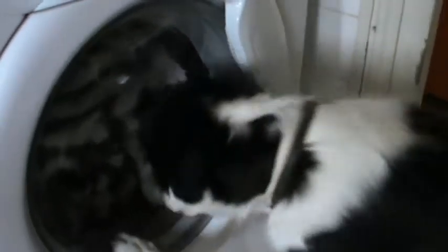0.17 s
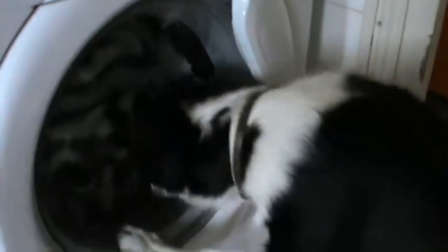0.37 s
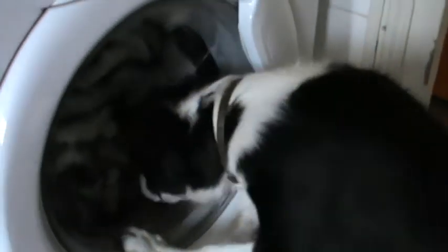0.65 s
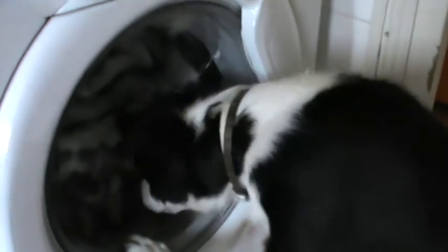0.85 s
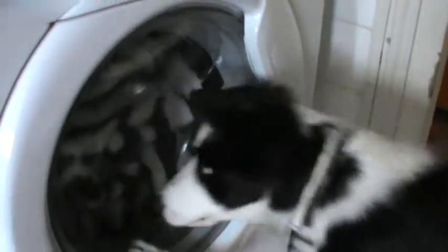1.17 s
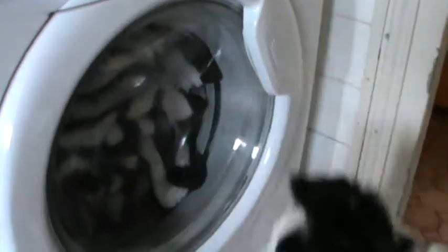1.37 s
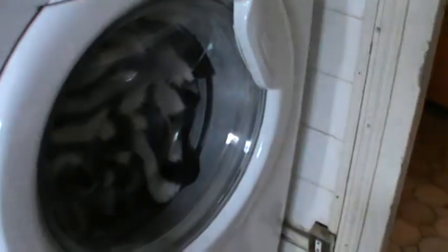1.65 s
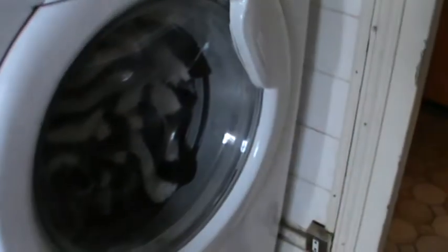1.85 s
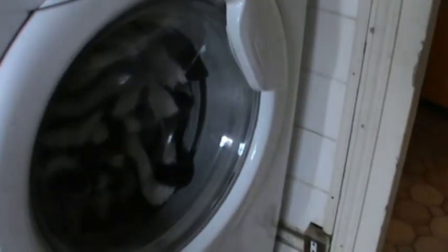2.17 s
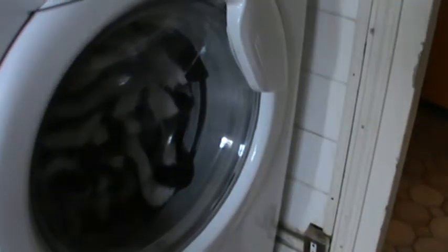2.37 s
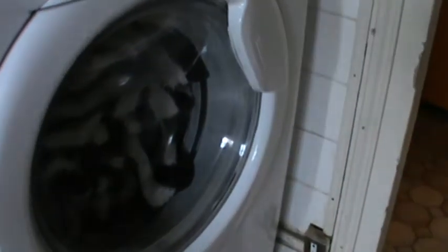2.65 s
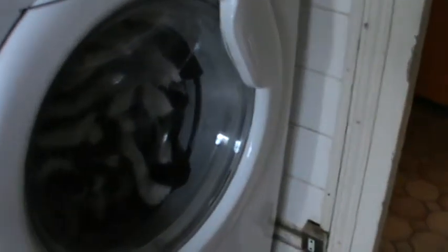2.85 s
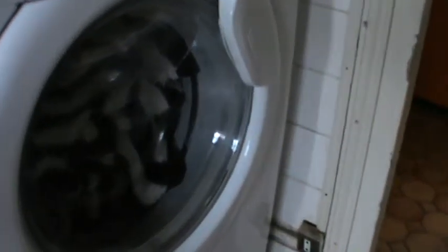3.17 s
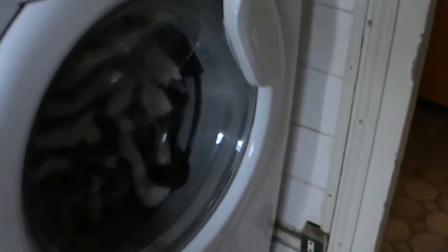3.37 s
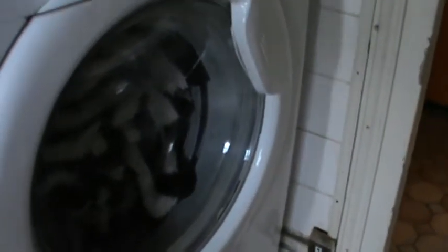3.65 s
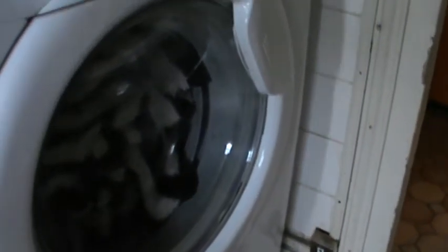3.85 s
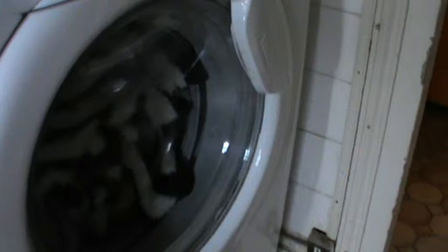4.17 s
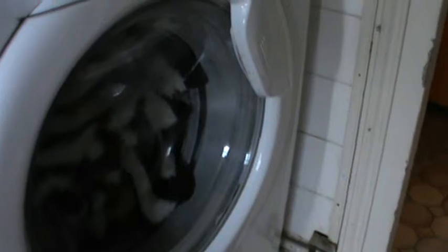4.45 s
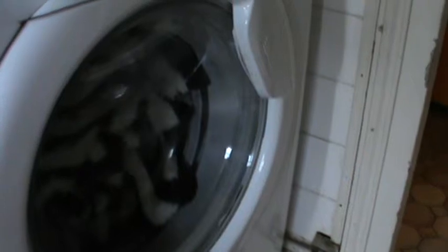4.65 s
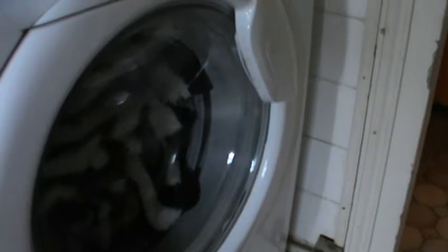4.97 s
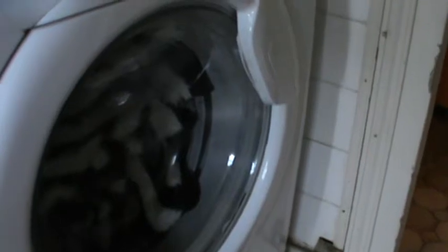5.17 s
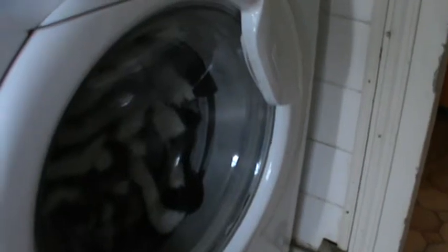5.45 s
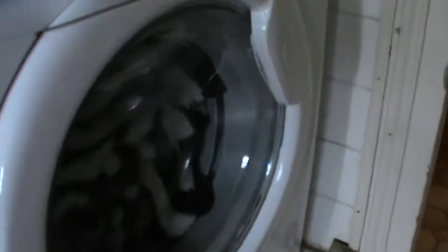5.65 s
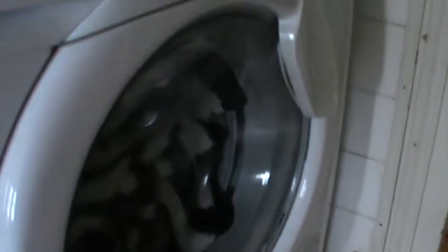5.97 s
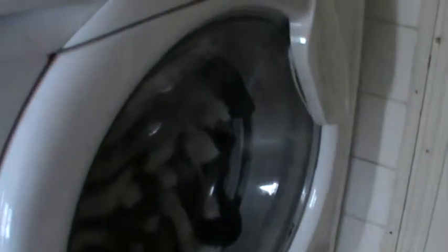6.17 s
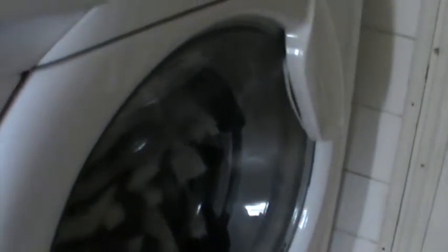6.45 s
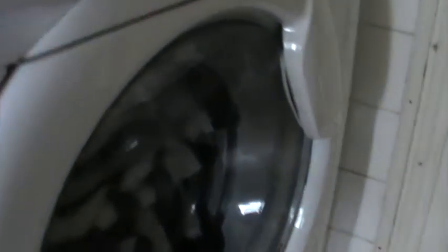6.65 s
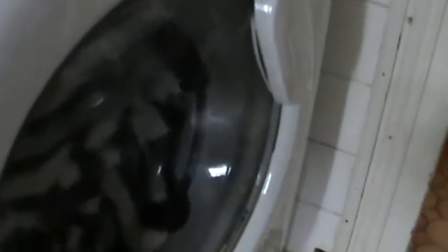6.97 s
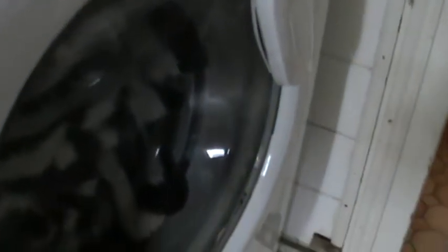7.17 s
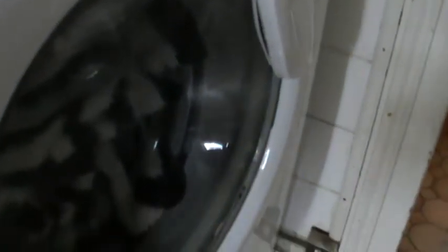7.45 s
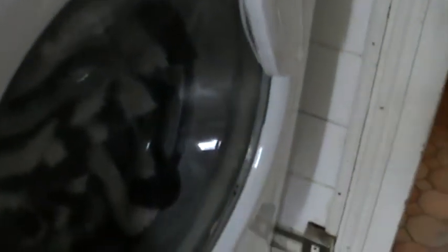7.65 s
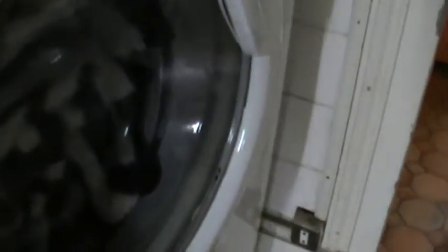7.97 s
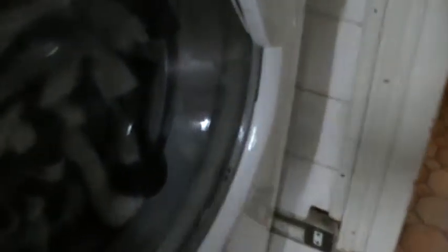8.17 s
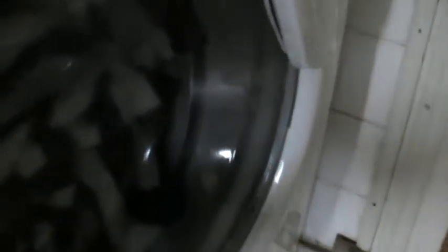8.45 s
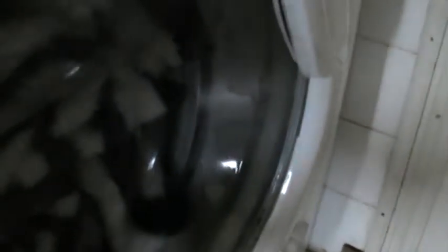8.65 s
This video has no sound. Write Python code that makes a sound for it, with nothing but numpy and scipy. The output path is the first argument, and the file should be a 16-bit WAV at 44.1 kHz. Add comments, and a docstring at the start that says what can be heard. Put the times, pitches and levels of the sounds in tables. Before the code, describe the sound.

Close to a front-loading washer in a small tiled room, water rushes in with a bright steady hiss and hollow roar over low cabinet rumble. Around five seconds it stops with a dull pipe thump, then a sharp relay snap rings briefly. Leftover water gurgles and drips while soft brushing and airy puffs pass. Quiet hum remains, ending with handling bumps on the stereo microphone.

```python
"""A front-loading washing machine fills: a jet hisses through the valve, roars in the soap drawer and drums on the cabinet.
These are coloured noises, over a buzzing valve coil and a faint hum in a small tiled room. The flow stops with a thump
in the pipe, a relay snaps, and the last water gurgles and drips into the drum; small dry ticks sound, some with late knocks.
Something brushes and puffs nearby, perhaps a dog panting. At the end a hand shifts on the body that holds
the two microphones: low thuds and creaks of noise, and knocks made of dying tones."""
import sys
import numpy as np
from scipy import signal
from scipy.fft import rfft, irfft
from scipy.io import wavfile
from scipy.ndimage import uniform_filter1d

SR = 44100
rng = np.random.default_rng(int(sys.argv[2]) if len(sys.argv) > 2 else 0)


def output_pcm(signal):
    """Save a mono or channel-first signal as 16-bit PCM at the path in sys.argv[1].

    Samples are clipped to [-1, 1] before scaling.
    """
    pcm = np.clip(np.atleast_2d(signal).T, -1, 1) * 32767
    wavfile.write(sys.argv[1], SR, np.round(pcm).astype(np.int16))


N = 388080  # samples, 8.8 s
HZ = np.fft.rfftfreq(4096, 1 / SR)  # frequencies of one short-time spectrum
T = np.arange(N) / SR  # seconds


def gain_of(db):
    """Decibels to amplitude."""
    return 10 ** (np.asarray(db) / 20)


def evened(x):
    """Scales to rms 1."""
    return x / np.sqrt(np.mean(x ** 2) + 1e-20)


def read(points, hz=HZ):
    """Reads a table of frequency and value between its points, on a log-frequency axis."""
    f, value = np.transpose(points)
    return np.interp(np.log(hz + 1), np.log(f + 1), value)


def level(rows):
    """Amplitude in time from a curve in dB, silent after its end."""
    s, db = np.transpose(rows)
    return gain_of(np.interp(T, s, db, right=-200))


def modes(table):
    """Spectrum of steep resonances, added in power; each has a pitch, a width and a level."""
    power = 0
    for hz, width, db in table:
        power = power + gain_of(2 * db) / (1 + (2 * (HZ - hz) / width) ** 2) ** 2
    return np.sqrt(power)


def noise(shape, same, patchy_db, lead=0 * HZ, lean_db=0 * HZ, ripple_db=0.):
    """Random short-time spectra with drifting patches and a fixed ripple of wall echoes, at two microphone ports."""
    frames = N // 1024 + 9
    a, b, c, d, patches = rng.standard_normal((frames, len(HZ), 5)).T
    patches = uniform_filter1d(patches, size=40, axis=0)
    patches = evened(uniform_filter1d(patches, size=3, axis=1))
    ripple = ripple_db * evened(uniform_filter1d(rng.standard_normal(len(HZ)), size=3))
    same = np.clip(same, 0, 1)[:, None]
    left, own = a + 1j * b, c + 1j * d
    right = same * left + np.sqrt(1 - same ** 2) * own
    half_lean = gain_of(lean_db / 2)[:, None]
    z = np.array([left * half_lean, right * np.exp(-1j * lead)[:, None] / half_lean])
    z = z * shape[:, None] * gain_of(patchy_db * patches + ripple[:, None])
    x = signal.istft(z, nperseg=4096, noverlap=3072)[1]
    return evened(x[:, 2048:N + 2048])


def flicker(hz, depth_db):
    """Random wavering of level up to about hz, rms 1."""
    lowpass = 1 / (1 + (np.fft.rfftfreq(N, 1 / SR) / hz) ** 4)
    smooth = irfft(rfft(rng.standard_normal(N)) * lowpass, N)
    return evened(gain_of(depth_db * evened(smooth)))


def swell(start, length, db, rise, fall_db_per_s):
    """Rises from start over rise seconds; from start + length on it also falls steadily in dB."""
    fade = gain_of(db - fall_db_per_s * np.maximum(T - start - length, 0))
    return np.clip((T - start) / max(rise, 1e-4), 0, 1) * fade


def held(db, end, fall_db_per_s):
    """Steady from the beginning until end, then dies away."""
    return gain_of(db - fall_db_per_s * np.maximum(T - end, 0))


def joined(parts):
    """Envelopes of unrelated sounds add in power."""
    return np.sqrt(sum(part ** 2 for part in parts))


# Likeness of left and right in the filling noise, set by frequency; the later noises use it too.
# Each row: frequency in Hz, likeness from 0 to 1.
LIKENESS = [(60, 0.57), (92, 0.85), (140, 0.9), (210, 0.94), (330, 0.83), (500, 0.84), (770, 0.77),
            (1170, 0.84), (1790, 0.79), (2740, 1), (4190, 0.8), (6410, 0.64), (9810, 0.46), (15000, 0.54)]
# How far the right port trails the left. Each row: frequency in Hz, phase in radians.
PORT_PHASE = [(0, -0.2), (780, -0.063), (6630, 0.048), (8270, 0.86), (9040, 0.53), (9990, 0.68),
              (11300, 0.52), (11700, 0.1), (14400, -0.4), (16500, 0.1)]
# How much louder the left port is. Each row: frequency in Hz, left minus right in dB.
PORT_LEAN = [(60, -6), (99, -6), (160, -0.5), (270, 0.0), (450, 1), (740, 2), (1220, 3.0), (2010, 0),
             (3330, 0), (5500, 1.5), (9080, -0.5), (15000, -1)]


def filling_noise(shape, patchy_db, ripple_db=0.):
    """Noise of the filling machine, with likeness, phase and balance of left and right set by frequency."""
    return noise(shape, read(LIKENESS) ** 0.79, patchy_db, read(PORT_PHASE), read(PORT_LEAN), ripple_db)


# Spray of the jet. Each row: frequency in Hz, relative level in dB per Hz.
SPRAY_COLOUR = [(500, -70), (1400, -27), (2200, -10.5), (2480, -15.5), (2790, -12), (3740, -5.5),
                (4500, -5), (5300, -5), (6100, -6), (7280, -4.5), (7920, -1.5), (11500, 0), (12700, -4),
                (13300, -7.5), (15500, -6), (16500, -12)]
# Faint whistles of hose and valve. Each row: frequency in Hz, width in Hz, relative level in dB.
PIPE_WHISTLES = [(2840, 36, -8), (3397, 30, -6), (3540, 34, -5), (3920, 50, -5), (4160, 45, 1),
                 (4436, 40, 2), (4640, 60, -2), (4727, 30, 1), (5400, 40, -5), (5616, 60, -3),
                 (6716, 20, -5), (6948, 40, -1), (7710, 40, -3), (7810, 40, -4), (8038, 27, -1),
                 (8220, 40, -4), (9034, 120, -3), (9830, 60, -4), (10410, 70, -3), (11180, 120, -3),
                 (11730, 60, -4), (12850, 80, -7), (13500, 70, -8), (14400, 300, -9)]
# Strength of the jet, with a last spurt as the valve closes. Each row: time in seconds, level in dB.
JET_STRENGTH = [(0, -19.5), (1.5, -19), (4.7, -19.5), (4.93, -20.5), (5.006, -32), (5.064, -28),
                (5.146, -44.5), (5.268, -62), (5.4, -70)]


def jet():
    """Turbulent water hisses through the valve and makes hose and valve whistle faintly."""
    shape = np.hypot(gain_of(read(SPRAY_COLOUR) - 3.0), modes(PIPE_WHISTLES) * gain_of(1.0))
    return filling_noise(shape, 1.32, 1.9) * flicker(60, 0.25) * level(JET_STRENGTH)


# Splash in the drawer. Each row: frequency in Hz, relative level in dB per Hz.
SPLASH_COLOUR = [(120, -64), (380, -14), (560, -17.5), (760, -10.5), (900, -8), (1050, -5), (1150, -9),
                 (1300, -18), (1520, -14), (1830, -18.5), (2100, -20.5), (2480, -25), (3000, -19),
                 (3900, -31)]
# Hollows of the drawer. Each row: frequency in Hz, width in Hz, relative level in dB.
DRAWER_CAVITIES = [(493, 24, -10), (606, 41, -10), (677, 19, -10), (841.5, 33, -2.5), (906, 17, -1.5),
                   (967.7, 33, 0.5), (997, 25, -1.5), (1036.5, 29, -1), (1068, 26, -4), (1120, 28, -5.5),
                   (1477, 45, -12.5), (1570, 30, -16), (2030, 98, -15.5)]
ROAR_DB, ROAR_ENDS_S, ROAR_FALL_DB_PER_S = -24.5, 5.06, 135  # the drawer empties after the jet stops


def drawer():
    """Splashing water roars in the soap drawer and rings its hollows."""
    shape = np.hypot(gain_of(read(SPLASH_COLOUR) + 0.2), modes(DRAWER_CAVITIES))
    roar = filling_noise(shape, 1.1, 1.15) * flicker(41, 1.05)
    return roar * held(ROAR_DB, ROAR_ENDS_S, ROAR_FALL_DB_PER_S)


# Shaken cabinet. Each row: frequency in Hz, relative level in dB per Hz.
CABINET_COLOUR = [(12, -70), (30, -48), (49, -36), (80, -16), (129, -11), (172, 2), (282, 5), (412, -4.5),
                  (520, 1.5), (680, -18), (1140, -90)]
# Ringing panels. Each row: frequency in Hz, width in Hz, relative level in dB.
PANEL_MODES = [(55, 14, -20), (170, 27, 1.5), (232.5, 17, 1), (270, 26, -3), (341.5, 22, 3.5)]
RUMBLE_DB, RUMBLE_ENDS_S, RUMBLE_FALL_DB_PER_S = -33, 5.13, 95  # rings on longer than the drawer


def cabinet():
    """The water drums on the cabinet, whose panels ring at low pitches."""
    shape = np.hypot(gain_of(read(CABINET_COLOUR) - 5.0), modes(PANEL_MODES))
    return filling_noise(shape, 1.0) * held(RUMBLE_DB, RUMBLE_ENDS_S, RUMBLE_FALL_DB_PER_S)


BUZZ_HZ, BUZZ_DB, BUZZ_ENDS_S, BUZZ_FALL_DB_PER_S = 100.7, -49, 5.44, 80
BUZZ_REST_DB = -70  # a faint buzz that lasts


def valve_coil():
    """The valve coil buzzes as a wavering tone with a narrow band of noise around it."""
    tone = np.sin(2 * np.pi * BUZZ_HZ * T) * flicker(8.3, 1.6)
    rough = noise(modes([(BUZZ_HZ, 24, 0)]), read(LIKENESS) ** 0.79, 0.65)
    strength = joined([held(BUZZ_DB, BUZZ_ENDS_S, BUZZ_FALL_DB_PER_S), gain_of(BUZZ_REST_DB)])
    return evened(tone + 0.44 * rough) * strength


# Quiet air and microphone hiss. Each row: frequency in Hz, relative level in dB per Hz.
AIR_COLOUR = [(15, -26), (40, -15), (100, -13), (200, -11), (305, -8), (380, -11), (670, -11.5),
              (1000, -15.5), (1840, -19), (2310, -19), (3230, -22), (9000, -23.5), (14800, -26.5),
              (15700, -24)]
# Likeness of left and right in the air. Each row: frequency in Hz, likeness from 0 to 1.
AIR_LIKENESS = [(60, 1), (150, 0.94), (380, 0.58), (950, 0.32), (2380, 0.24), (5980, 0.18), (15000, 0.76)]
AIR_DB = -55
HUM_HZ, OVERTONE_HZ, HUM_DB = 148, 296, -64


def room():
    """Quiet air, microphone hiss and a wavering hum with a fainter overtone."""
    overtone = gain_of(-7) * np.sin(2 * np.pi * OVERTONE_HZ * T)
    hum = (np.sin(2 * np.pi * HUM_HZ * T) + overtone) * flicker(3, .8)
    air = noise(gain_of(read(AIR_COLOUR)), read(AIR_LIKENESS), .6)
    return gain_of(AIR_DB) * air + gain_of(HUM_DB) * evened(hum)


HAMMER_S, HAMMER_RISE_S, HAMMER_DB, HAMMER_FALL_DB_PER_S = 5.05, .06, -31.5, 75
SHUDDER_DB, SHUDDER_FALL_DB_PER_S = -52, 15  # a softer, slower fading shudder


def pipe_hammer():
    """The pipe thumps as the flow stops, then keeps shuddering softly."""
    hammer = noise(modes([(55, 30, -14), (105, 23, 1.0), (155, 38, 0)]), read(LIKENESS) ** 0.79, 1.1)
    thump = swell(HAMMER_S, HAMMER_RISE_S, HAMMER_DB, HAMMER_RISE_S, HAMMER_FALL_DB_PER_S)
    shudder = swell(HAMMER_S, HAMMER_RISE_S, SHUDDER_DB, HAMMER_RISE_S, SHUDDER_FALL_DB_PER_S)
    return hammer * joined([thump, shudder])


DRAIN_S = 5.2  # the last water runs down from here


def drain(db, fall_db_per_s):
    """Level of the last water: a quick start, then a steady fade."""
    return swell(DRAIN_S, 0, db, .05, fall_db_per_s)


# Hollows of the drum. Each row: frequency in Hz, width in Hz, relative level in dB.
DRUM_CAVITIES = [(482, 45, 0), (610, 90, -3.5), (767, 100, -2), (922, 91, -1.5), (1430, 59, -15.5),
                 (2150, 73, -18)]
# Soft rustle, also used for the trickle. Each row: frequency in Hz, relative level in dB per Hz.
RUSTLE_COLOUR = [(700, -13), (1300, -3.5), (2500, -4.5), (4000, -10), (6000, -12), (12000, -38)]
# Low wash of the water. Each row: frequency in Hz, relative level in dB per Hz.
WASH_COLOUR = [(30, -18), (60, -10), (200, 3), (350, -2.5), (450, -23)]
TRICKLE_DB, TRICKLE_FALL_DB_PER_S = -44.5, 8
TRICKLE_ENDS_S, DRY_FALL_DB_PER_S = 6.5, 11  # from here this extra fall dries it up faster
WASH_DB, WASH_FALL_DB_PER_S = -53, 9
GURGLE_HZ, GURGLE_DB = 14, 1.5  # speed and depth of the gurgle


def draining():
    """A trickle rings the hollows of the drum over a low wash; both gurgle together."""
    shape = modes(DRUM_CAVITIES) + gain_of(read(RUSTLE_COLOUR) - 15.5)
    trickle = noise(shape, read(LIKENESS), 2.1, lean_db=read(PORT_LEAN)) * flicker(70, 2.2)
    trickle = trickle * drain(TRICKLE_DB, TRICKLE_FALL_DB_PER_S)
    trickle = trickle * held(0, TRICKLE_ENDS_S, DRY_FALL_DB_PER_S)
    wash = noise(gain_of(read(WASH_COLOUR)), read(LIKENESS), 1.1) * drain(WASH_DB, WASH_FALL_DB_PER_S)
    return (trickle + wash) * flicker(GURGLE_HZ, GURGLE_DB)


# Something soft brushes nearby.
# Each row: start in seconds, length in seconds, rustle level in dB, hollow scuff level in dB.
BRUSH_STROKES = [(5.44, 0.085, -46.5, -75), (5.61, .11, -53, -75), (6.175, .03, -55, -75),
                 (6.38, 0.084, -52.5, -58), (7.045, .04, -57, -61), (7.18, .03, -62, -62),
                 (7.36, .13, -56.5, -53.5), (7.5, .22, -59.5, -60), (7.99, 0.06, -54, -60),
                 (8.12, .06, -58, -72), (8.39, .1, -52, -53), (8.535, .045, -53, -49)]
BRUSH_RISE_S, BRUSH_FALL_DB_PER_S = 0.021, 220
SPLASH_DB, SPLASH_FALL_DB_PER_S = -54, 10  # middle pitches of the draining water


def brushing():
    """Brush strokes rustle and scuff as noise; the rustle also carries the splash of the draining water."""
    rustle = noise(gain_of(read(RUSTLE_COLOUR)), 0.62 * read(LIKENESS), 2.9, ripple_db=3.0) * flicker(50, 2.6)
    scuff = noise(modes([(650, 290, -3.5), (970, 420, -1.5)]), 0.87 * read(LIKENESS), 0.99) * flicker(60, 1.2)
    rustling, scuffing = [drain(SPLASH_DB, SPLASH_FALL_DB_PER_S)], []
    for start, length, rustle_db, scuff_db in BRUSH_STROKES:
        rustling.append(swell(start, length, rustle_db, BRUSH_RISE_S, BRUSH_FALL_DB_PER_S))
        scuffing.append(swell(start, length, scuff_db, BRUSH_RISE_S, BRUSH_FALL_DB_PER_S))
    return rustle * joined(rustling) + scuff * joined(scuffing)


# Treble of the puffs. Each row: frequency in Hz, relative level in dB per Hz.
PUFF_COLOUR = [(3000, -30), (5000, -1), (7500, 0.5), (10000, 4), (13000, 2), (16500, -5.5)]
# Airy puffs, perhaps a dog panting nearby. Each row: start in seconds, length in seconds, level in dB.
PUFF_TIMES = [(5.49, .07, -53), (5.65, .05, -53), (5.809, 0.075, -46), (5.97, .1, -51), (6.165, .06, -50.5),
              (6.29, .03, -55), (6.357, 0.046, -53), (6.62, .07, -59), (6.8, .05, -61), (7.105, .02, -60),
              (7.54, .05, -61), (7.66, .05, -63), (7.985, .065, -51), (8.11, .05, -55), (8.22, .36, -59),
              (8.713, .04, -56)]
PUFF_RISE_S, PUFF_FALL_DB_PER_S = 0.031, 190
SPRAY_DB, SPRAY_FALL_DB_PER_S = -56.5, 6  # treble of the draining water


def puffing():
    """Short puffs of treble hiss; the same hiss carries the treble of the draining water."""
    air = noise(gain_of(read(PUFF_COLOUR)), 1.1 * read(LIKENESS), 1.6) * flicker(30, 1.2)
    puffs = [swell(*row, PUFF_RISE_S, PUFF_FALL_DB_PER_S) for row in PUFF_TIMES]
    return air * joined(puffs + [drain(SPRAY_DB, SPRAY_FALL_DB_PER_S)])


def bursts(table, t60):
    """Each drop or tick is a short noise burst coloured around its pitch: narrow ones plop, wide ones click."""
    out, t = np.zeros((2, N + SR)), T[:4096]
    fade = gain_of(-60 * t / t60) * np.minimum(t / 0.00076, 1)
    for s, db, hz, pan_db, spread in table:
        colour = 1 / (1 + (np.log((HZ + 1) / hz) / spread) ** 2) ** 2
        ring = irfft(rfft(rng.standard_normal(4096)) * colour) * fade
        port_db = db + np.array([[.5], [-.5]]) * pan_db
        out[:, round(s * SR):][:, :len(t)] += gain_of(port_db) * ring / abs(ring).max()
    return out[:, :N]


DROPLET_COUNT, DROPLET_DB, DROPLET_SCATTER_DB = 45, -46.5, 4
DROPLET_LOW_HZ, DROPLET_HIGH_HZ = 480, 3800


def droplets():
    """Lists small drops of random pitch and size, thinning out and fading with the trickle."""
    when, pitch, size = rng.random((DROPLET_COUNT, 3)).T
    since = (TRICKLE_ENDS_S - DRAIN_S) * when ** 1.3
    hz = DROPLET_LOW_HZ * (DROPLET_HIGH_HZ / DROPLET_LOW_HZ) ** (pitch ** 1.5)
    db = DROPLET_DB - TRICKLE_FALL_DB_PER_S * since + DROPLET_SCATTER_DB * (2 * size - 1)
    return list(zip(DRAIN_S + since, db, hz))


# Drops plopping in the drum. Each row: time in seconds, peak level in dB, pitch in Hz.
DRIP_TIMES = [(5.327, -43, 826), (5.397, -31, 783), (5.481, -37, 950), (5.571, -32, 880), (5.671, -38, 830),
              (5.708, -32, 1920), (5.777, -33.5, 902), (5.807, -38, 750), (5.857, -42, 902),
              (5.957, -35, 755), (6.062, -41, 900), (6.082, -45, 900), (6.124, -43, 900), (6.184, -42, 894),
              (6.463, -35, 770), (6.589, -49, 767), (6.666, -48, 756), (7.059, -48, 1300),
              (7.317, -51, 767), (8.129, -45, 1230), (8.396, -47, 875), (8.623, -43, 657)]
DRIP_T60_S, DRIP_SPREAD, DRIP_PAN_DB = .038, .15, 1.6  # 60 dB decay, share of pitch, left minus right


def drips():
    """Listed drops and random droplets plop as narrow bursts."""
    drops = list(DRIP_TIMES) + droplets()
    return bursts([(*row, DRIP_PAN_DB, DRIP_SPREAD) for row in drops], DRIP_T60_S)


# Small dry ticks, and at 8.329 and 8.568 s the clicks of the knocks on the body.
# Each row: time in seconds, peak level in dB, pitch in Hz, left minus right in dB, spread as share of pitch.
TICK_TIMES = [(5.2859, -35, 3000, 5, .35), (5.303, -36, 3300, 5, .35), (5.6151, -38, 3040, 5, .3),
              (5.7695, -29, 5000, 5, .55), (5.8711, -32, 4600, 5, .55), (6.3599, -44, 5540, 2, .3),
              (6.5316, -43, 5000, 4, .2), (7.2913, -45, 12500, -0.5, .3), (7.5188, -41, 5390, 11, .25),
              (8.0007, -48, 10700, 0.5, .4), (8.1289, -48, 3420, 0.0, .6), (8.329, -39, 2500, 0.5, .8),
              (8.4043, -45, 2610, 1.1, .6), (8.5679, -34, 3000, 1.5, 1.3), (8.6443, -47, 4900, 9.5, .2)]


def ticks():
    """Small dry ticks and the clicks of two late knocks, as bursts that fade by 60 dB in 0.033 s."""
    return bursts(TICK_TIMES, 0.033)


# How fast cabinet and tiles stop ringing. Each row: frequency in Hz, time to fall by 60 dB in seconds.
RING_DECAY = [(1000, 0.39), (3000, 0.29), (7000, 0.31), (12000, 0.21), (16000, .12)]


def tail(seconds):
    """Dense reflections, each band dying at its own speed, partly different at each port; left energy is 1."""
    common = rng.standard_normal((1, int(seconds * SR)))
    own = rng.standard_normal((2, int(seconds * SR)))
    hz, t, z = signal.stft(common + 0.45 * own, SR, nperseg=128)
    x = signal.istft(z * gain_of(-60 * t / read(RING_DECAY, hz)[:, None]), SR, nperseg=128)[1]
    return x / np.linalg.norm(x[0])


def tile_echo(small):
    """Drips and ticks wake the tiled room: their average over the ports is smeared by dense reflections."""
    echo = signal.fftconvolve(small.mean(0)[None], tail(0.32), axes=1)[:, :N]
    return gain_of(-7.5) * echo


# Colour of the relay's crack. Each row: frequency in Hz, relative level in dB per Hz.
SNAP_COLOUR = [(350, -37), (700, -20), (1300, -18), (2000, -10.5), (3300, -13), (3800, -18), (5300, -10),
               (7200, -17), (8400, -6), (10000, -7), (12200, -1), (13500, -12), (16500, -14)]
SNAP_S, SNAP_DB = 5.432, -5  # time, and peak of the crack before the ring is added


def relay_snap():
    """The relay gives a sharp broadband crack, with the ring of cabinet and tiles behind it."""
    log_gain = np.log(gain_of(read(SNAP_COLOUR)))
    circle = np.concatenate([log_gain, log_gain[-2:0:-1]])
    # this phase makes the crack start at once and die away, with nothing before it
    crack = np.fft.ifft(np.exp(np.conj(signal.hilbert(circle)))).real[:1024]
    crack *= gain_of(SNAP_DB) / abs(crack).max()
    ring = signal.fftconvolve(crack[None], tail(.5), axes=1) * gain_of(4.0)
    ring *= 1 + 1.6 * gain_of(-60 * T[:ring.shape[1]] / 0.047)  # the nearest surfaces answer loudest
    ring[:, :len(crack)] += crack
    out = np.zeros((2, N))
    out[:, round(SNAP_S * SR):][:, :ring.shape[1]] += ring
    return out


def struck(s, db, table, rise):
    """One blow at time s on a set of decaying modes; a soft blow takes rise seconds to build."""
    t = np.maximum(T - s, 0)
    ring = 0
    for hz, ring_db, t60 in table:
        ring = ring + gain_of(ring_db - 60 * t / t60) * np.sin(2 * np.pi * hz * t)
    return gain_of(db) * ring * np.minimum(t / rise, 1)


# The hand tightens. Each row: start in seconds, length in seconds, thud level in dB, creak level in dB.
SQUEEZES = [(8.325, 0.078, -50, -49), (8.56, .05, -42, -48)]
# Knocks on the held body. Each row: time in seconds, strength in dB.
KNOCKS = [(8.33, -37), (8.405, -44), (8.569, -37.5), (8.585, -41), (8.62, -45)]
# Ring of the body in the hand. Each row: frequency in Hz, level in dB, time to fall by 60 dB in seconds.
BODY_MODES = [(58, -14, .5), (95, -1, 0.28), (171, -3.5, .15), (280, -6, .08)]
# Hollow plastic tap. Each row: frequency in Hz, level in dB, time to fall by 60 dB in seconds.
TAP_MODES = [(480, -6, 0.047), (666, 1.5, 0.081), (900, -15, 0.035), (1100, -7, .035), (1280, -6, 0.039),
             (1600, -7, 0.041), (1970, -11, 0.036)]
TAP_S, TAP_DB = 8.5335, -28.5
GRIP_RISE_S, THUD_FALL_DB_PER_S, CREAK_FALL_DB_PER_S = .025, 120, 90
HOLD_THUD_DB, HOLD_CREAK_DB = -53.5, -61  # lasting level once the hand has moved


def grip():
    """A hand shifts on the body: noisy thuds and creaks, and ringing knocks, much alike in both ports."""
    thud = noise(modes([(58, 22, 0), (95, 45, -1)]), 0 * HZ + 1, 1.5)
    creak = noise(modes([(180, 110, 1), (300, 150, -7)]), 0 * HZ + 0.99, 1.5)
    holding = np.clip((T - SQUEEZES[0][0]) / GRIP_RISE_S, 0, 1)
    thuds, creaks = [holding * gain_of(HOLD_THUD_DB)], [holding * gain_of(HOLD_CREAK_DB)]
    for start, length, thud_db, creak_db in SQUEEZES:
        thuds.append(swell(start, length, thud_db, GRIP_RISE_S, THUD_FALL_DB_PER_S))
        creaks.append(swell(start, length, creak_db, GRIP_RISE_S, CREAK_FALL_DB_PER_S))
    knocks = sum(struck(s, db, BODY_MODES, .0007) for s, db in KNOCKS)
    tap = struck(TAP_S, TAP_DB, TAP_MODES, .003)
    return thud * joined(thuds) + creak * joined(creaks) + knocks + tap


def scene():
    """Adds all sources; drips and ticks also wake the tiled room."""
    filling = jet() + drawer() + cabinet() + valve_coil() + pipe_hammer()
    afterflow = draining() + brushing() + puffing()
    small = drips() + ticks()
    return filling + room() + afterflow + small + tile_echo(small) + relay_snap() + grip()


EDGE_HZ = 15780  # upper edge of the sound


def record(dry):
    """A steep low-pass filter takes away everything well above the edge."""
    lowpass = signal.firwin(1023, EDGE_HZ, window=("kaiser", 9), fs=SR)
    return signal.oaconvolve(dry, lowpass[None], "same")


dry = scene()
out = record(dry)
output_pcm(out)
```